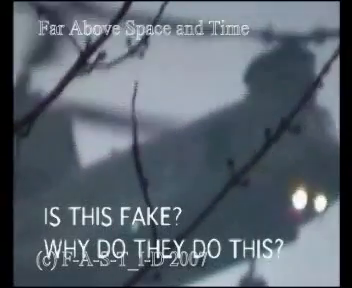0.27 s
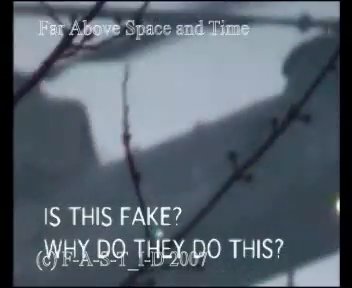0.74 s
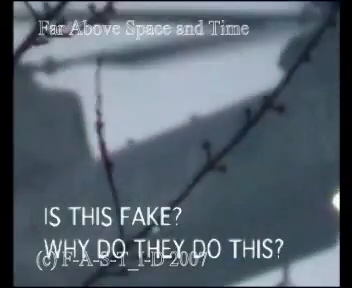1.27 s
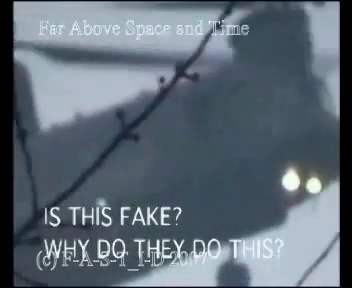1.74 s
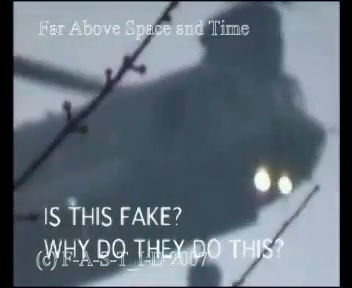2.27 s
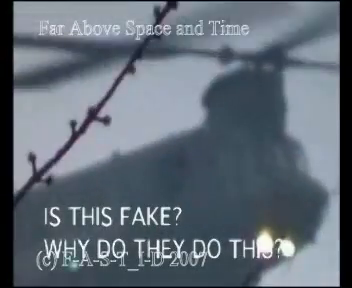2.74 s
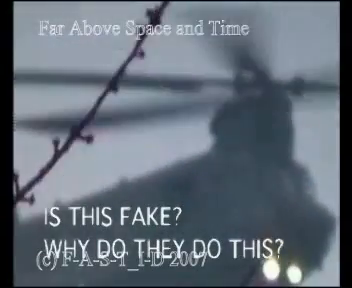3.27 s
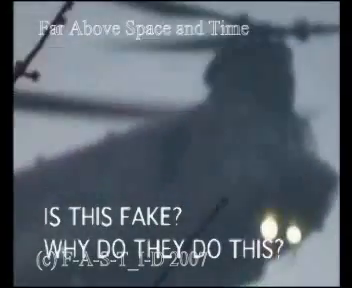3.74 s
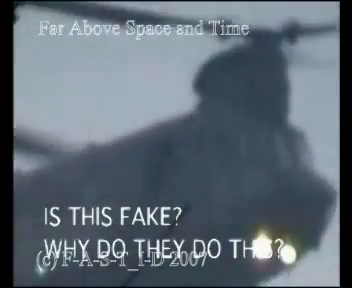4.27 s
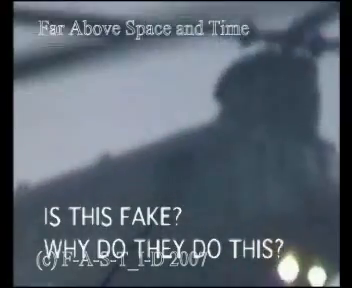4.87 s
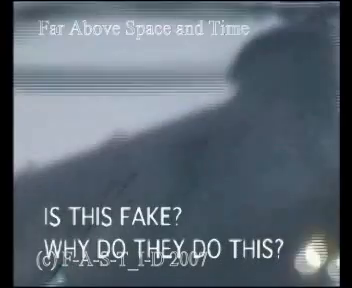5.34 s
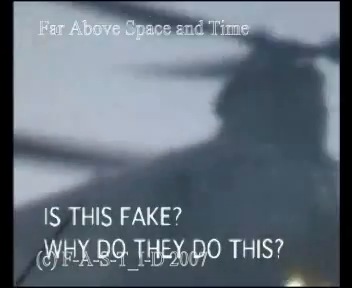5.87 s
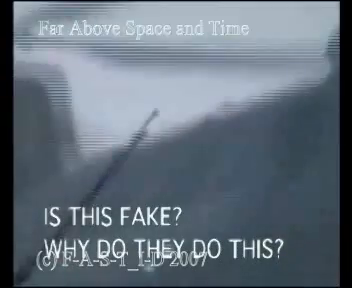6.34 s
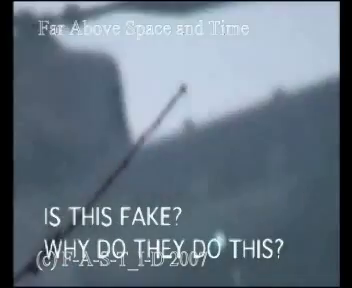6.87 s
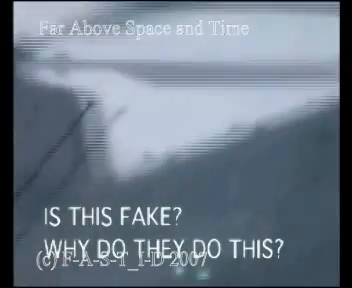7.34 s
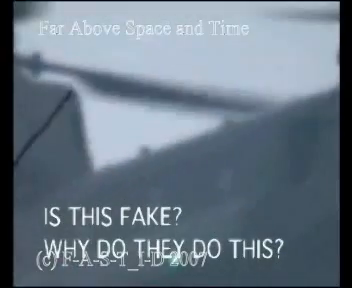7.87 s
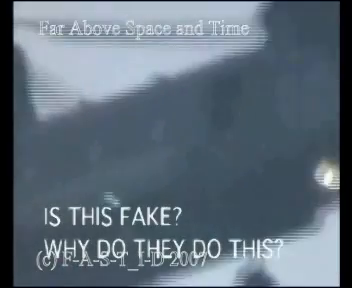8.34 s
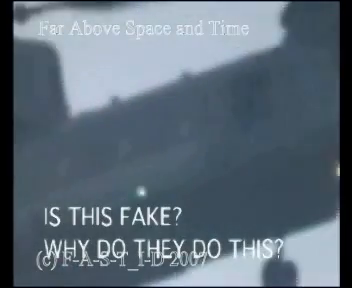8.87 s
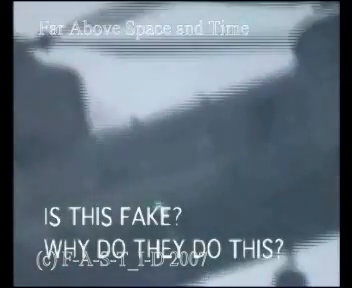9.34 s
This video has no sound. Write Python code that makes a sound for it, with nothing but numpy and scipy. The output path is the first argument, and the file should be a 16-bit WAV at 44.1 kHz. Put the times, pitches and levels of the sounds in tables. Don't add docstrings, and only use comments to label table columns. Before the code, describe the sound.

A large helicopter hangs low overhead outdoors. Its broad, mid-heavy roar starts loud with crisp rapid blade slaps, falls back to a smoother wash, swells around five seconds, dips, then surges hardest just after seven before fading. Thin gear whistles show through the quieter parts. A small camera microphone adds plastic ticks, faint hiss and low wind puffs; treble is dull and peaks are squashed.

```python
import sys
import numpy as np
from scipy import signal
from scipy.fft import rfft, irfft, next_fast_len
from scipy.io import wavfile
from scipy.ndimage import uniform_filter1d, minimum_filter1d, map_coordinates

SR = 44100
rng = np.random.default_rng(int(sys.argv[2]) if len(sys.argv) > 2 else 0)


def volts_from_decibels(level):
    exponent = np.asarray(level, float) / 20
    return 10 ** exponent


def dump_mix(stems):
    frames = np.atleast_2d(stems).T
    limited = np.clip(frames, -1, 1)
    pcm = np.round(limited * 32767).astype(np.int16)
    wavfile.write(sys.argv[1], SR, pcm)


N = 423360
TIME = np.arange(N) / SR
SLAP_PHASE = .34


def rms_one(x):
    return x / np.sqrt(np.mean(x ** 2) + 1e-20)


def in_time(rows):
    seconds, *columns = np.transpose(rows)
    return [np.interp(TIME, seconds, column) for column in columns]


def at_hz(points, hz):
    points_hz, values = np.transpose(points)
    return np.interp(np.log(hz), np.log(points_hz), values)


def drift(rate):
    r = np.exp(-80 * np.pi * rate / SR)
    noise = rng.standard_normal(N // 40 + 2002)
    slow = rms_one(signal.lfilter([1], [1, -2 * r, r * r], noise)[2000:])
    return np.interp(np.arange(N) / 40, np.arange(len(slow)), slow)


def resonance(x, hz, width):
    r = np.exp(-np.pi * width / SR)
    feedback = [1, -2 * r * np.cos(2 * np.pi * hz / SR), r * r]
    return signal.lfilter(np.array([1, 0, -1]) * (1 - r * r) / 2, feedback, x + 1e-18)


def band(x, low_hz, high_hz):
    lead = 2000
    sos = signal.butter(2, [low_hz, high_hz], "band", fs=SR, output="sos")
    return signal.sosfilt(sos, np.r_[x[-lead:], x])[lead:]


def shaped(x, gain_at, causal=False):
    size = next_fast_len(N)
    gain = gain_at(np.maximum(np.arange(size // 2 + 1) * SR / size, 1))
    if causal:
        fold = irfft(np.log(gain), size)
        fold[1:size // 2] *= 2
        fold[size // 2 + 1:] = 0
        gain = np.exp(rfft(fold))
    return irfft(rfft(x, size) * gain, size)[:N]


def gusts():
    # time in seconds, loudness in dB, clearness in dB.
    air_path = [(0, -11, -2.5), (.5, -14, -0.5), (.8, -18.5, -0.5), (1.25, -18.5, 0), (1.7, -15.5, -0.5),
                (2.25, -18.5, -1.5), (2.7, -14.5, 2.5), (3.2, -18, -0.5), (3.85, -19.5, 0.5),
                (4.4, -16.5, -0.5), (4.9, -12, 1), (5.35, -15.5, -1.5), (5.8, -22, 2.5),
                (6.45, -18.5, -5.5), (7.2, -11.5, 2), (7.85, -14.5, 1.5), (8.2, -17, -2.5),
                (9.1, -17.5, -2)]
    # middle in seconds, clearness in dB, half length in seconds.
    still_air = [(.52, -0.5, 0.11), (1.059, 1, 0.068), (2.421, 2.5, 0.15), (2.802, 0, 0.082),
                 (3.33, 0, 0.087), (3.496, -2, 0.091), (4.286, 1, 0.2), (4.515, -1, 0.13), (5.054, 2, 0.13),
                 (5.33, 1.5, 0.084), (6.0, 0, 0.097), (6.336, 4, 0.3), (6.656, 0.5, 0.085),
                 (7.744, 1, 0.24), (8.624, 5.5, 0.26), (9.305, 2.5, .15)]
    loud_db, clear_db = in_time(air_path)
    pocket_db = sum(db * np.exp(-((TIME - s) / half) ** 2) for s, db, half in still_air)
    fade_db = 3 * np.maximum(TIME - air_path[-1][0], 0)
    return loud_db - fade_db + 0.42 * pocket_db, clear_db + pocket_db


def lifts(body):
    # time in seconds, peak in dB.
    early = [(.009, -3.5), (0.041, -2.5), (0.069, -6), (0.098, -10.5), (0.132, -4.5), (0.162, -7.5),
             (0.191, -5), (0.226, -11.5), (0.256, 0), (0.287, -2), (0.346, 1.5), (0.379, -6.5),
             (0.408, -1.5), (0.439, -5), (0.471, -11), (0.539, -9.5), (0.564, -6), (0.881, -7.5),
             (4.247, -7.5), (4.343, -5.5), (4.371, -5.5), (4.467, -3), (4.69, -12), (4.723, -8.5),
              (4.77, -7), (4.833, -2.5), (4.921, 0.5), (4.951, -1.5), (5.014, 1.5), (5.147, 0), (5.193, -3),
              (5.456, -6.5)]
    late = [(6.623, -5.5), (6.705, -12.5), (6.737, -4), (6.774, -4.5), (6.93, -13), (6.979, -3),
            (7.018, -0.5), (7.073, 0), (7.132, -0.5), (7.196, -1.5), (7.226, 0), (7.295, 6.5), (7.38, -6),
            (7.411, -10.5), (7.446, -1), (7.482, 1.5), (7.522, -6), (7.632, -11)]
    # three single ones, then a run from 6.06 to 6.46 s as the last gust gathers.
    further = [
        (0.787, -11.5),
        (6.587, -5),
        (7.348, -2),
               (6.064, -16), (6.134, -11.5), (6.212, -12.5), (6.311, -10.5), (6.338, -5), (6.367, -11),
            (6.407, -3), (6.456, -11)]
    crest_db, share = 6.5, 0.96
    seconds, db = np.transpose(early + late + further)
    at, lift = (seconds * SR).astype(int), np.zeros(N)
    lift[at] = share * np.clip(db - body[at] - crest_db, 1, 9)
    return lift


def blows(lift):
    decay_ms, lull_ms = 5.6, 3.1
    after = signal.lfilter([1], [1, -np.exp(-1000 / (decay_ms * SR))], lift + 1e-18)
    before = signal.lfilter([0, 1], [1, -np.exp(-1000 / (lull_ms * SR))], lift[::-1] + 1e-18)[::-1]
    return uniform_filter1d(after - before, 30)


def patches(hz):
    # middle in seconds, centre in Hz, change in dB, half length in seconds.
    brief_changes = [(0.304, 5500, 4, 0.27), (0.298, 515, -3.5, .12), (0.64, 566, 2.5, 0.19),
                     (0.759, 3780, 3.5, 0.069), (.85, 1160, -2, 0.36), (0.998, 5000, 4, .2), (1.5, 3810, -1, 0.11),
                     (1.891, 848, 0.5, 0.17), (1.9, 5030, 1.5, .1), (2.332, 4530, -5, 0.15),
                     (2.65, 2250, -1.5, .2), (2.848, 4000, 4, .12), (3.3, 1720, 5, 0.11), (3.505, 3790, 4.5, 0.11),
                     (3.52, 582, -2, .13), (3.753, 3800, -0.5, 0.16), (4.202, 850, 1.5, 0.32),
                     (4.446, 4040, 6, 0.16), (4.998, 576, 3, .15), (4.9, 4500, -1, 0.12), (5.349, 4200, 3.5, 0.2),
                     (5.701, 575, 2.5, 0.13), (5.301, 1200, -1, 0.19), (5.754, 1475, 2.5, .1),
                     (6.42, 1355, 5, 0.14), (6.3, 333, -3.5, 0.11), (7.2, 650, -0.5, 0.11), (7.554, 650, 5, 0.13),
                     (8.1, 5500, -3, 0.12), (8.492, 1210, 0, 0.11), (8.72, 1740, -6, 0.14),
                     (9.296, 1136, -4, 0.072), (9.5, 3530, -0.5, 0.16), (9.502, 650, -4.5, 0.16),
                     (1.051, 754, 0.5, 0.17), (1.079, 332, 2, 0.14), (1.798, 514, -3, .12), (2.78, 560, 1, 0.076),
                     (3.15, 657, -0.5, 0.13), (3.598, 990, -1.5, .1), (5.0, 261, 0.5, 0.2), (5.446, 230, 3, 0.23),
                     (6.93, 557, -0.5, .15), (8.5, 221.5, -7, 0.14), (0.648, 130, 4.5, .1), (6.348, 140, 4, 0.14),
                     (8.553, 335, 2.5, .15), (4.648, 6030, 2, .15), (8.903, 775, -1, 0.13)]
    s, centre_hz, db, half = np.transpose(brief_changes)[:, :, None]
    coarse = TIME[::200]
    octaves = np.log2(hz / centre_hz)
    bend = db * np.exp(-((coarse - s) / half) ** 2 - (octaves / .45) ** 2)
    return np.interp(TIME, coarse, bend.sum(axis=0))


def slaps(turns, jitter_ms, spread_db, burst_ms):
    # time in seconds, level in dB over the roar.
    slap_level = [(0, -7), (.25, -6.5), (.6, -7), (.95, -20), (4, -20), (6.1, -18), (6.38, -12), (6.6, -17),
                  (6.95, -10), (7.25, -6), (7.6, -11), (7.9, -20), (9.6, -18)]
    blade_db = [1.5, -1.0, 0.5, -1.5, 1.0]
    passages = np.flatnonzero(np.diff(np.floor(turns - SLAP_PHASE)) > 0)
    chance = rng.standard_normal((len(passages), 2))
    late = (chance[:, 0] * jitter_ms * SR / 1000).astype(int)
    at = np.clip(passages + late, 0, N - 1)
    clicks = np.zeros(N)
    clicks[at] = volts_from_decibels(np.resize(blade_db, len(at)) + spread_db * chance[:, 1])
    fade = np.exp(-1000 / (burst_ms * SR))
    tails = signal.lfilter([1], [1, -fade], clicks + 1e-18) * rng.standard_normal(N)
    return rms_one(rms_one(clicks) + .85 * rms_one(tails)) * volts_from_decibels(in_time(slap_level)[0])


def roar(turns, patchy_db, throb_db, turn_db):
    # pitch in Hz, level in dB per Hz.
    roar_colour = [(60, -26), (130, -10.5), (200, -5.5), (290, 0), (550, -1), (1000, -3.5), (1500, -8.5),
                   (1800, -14), (2400, -17.5), (2900, -23.5), (4500, -34), (6800, -43.5), (8000, -56),
                   (11500, -93)]
    # pitch in Hz, level in dB.
    slap_colour = [(250, -8), (600, 0), (1300, 3), (2500, 2), (4000, -3), (6500, -8), (9000, -24)]
    gust_hz = [170, 400, 1250, 2600, 5200]
    loud_share = [.45, 1.0, 1.0, 1.0, 1.0]
    clear_share = [-0.017, -0.78, 0.66, 0.96, 0.36]
    # time in seconds, depth in dB, lag of lows and lag of highs in passages.
    swish = [(0, 2.2, .2, .2), (.6, 1.8, .27, .2), (1.2, 1.1, .33, .3), (3.2, 1.1, .33, .3),
             (4.4, 1.5, .36, .33), (5.6, 1.0, .33, .3), (6.5, 1.7, .34, .28), (7.3, 2.2, .27, .22),
             (7.8, .7, .5, .35), (8.3, 1.0, .7, .45), (9.6, .8, .72, .45)]
    body, clear = gusts()
    swell = [(loud - 1) * (body - np.mean(body)) + open_air * clear + .7 * drift(1.5)
             for loud, open_air in zip(loud_share, clear_share)]
    angle = 2 * np.pi * turns / 5
    uneven = np.cos(angle + 2.2) + np.cos(2 * angle - 2.5)
    depth, *lags = in_time(swish)
    dull, bright = [throb_db * depth * np.cos(2 * np.pi * (turns - SLAP_PHASE - lag)) + turn_db * uneven
                    for lag in lags]
    white = rng.standard_normal((2, N))
    slap = slaps(turns, jitter_ms=.4, spread_db=1.2, burst_ms=2.0)
    shimmer = [drift(16) for _ in range(10)]
    edges, out = 50 * 2 ** (np.arange(25) / 3), 0
    for k, (low, high) in enumerate(zip(edges, edges[1:])):
        hz = np.sqrt(low * high)
        place = np.interp(np.log(hz), np.log(gust_hz), np.arange(len(swell)))
        lower = min(int(place), len(swell) - 2)
        gust = swell[lower] + (place - lower) * (swell[lower + 1] - swell[lower])
        mix = k % 3 * np.pi / 6
        eddy = np.cos(mix) * shimmer[k // 3] + np.sin(mix) * shimmer[k // 3 + 1]
        lively = np.clip(np.log2(hz / 150) / 2.1, 0, 1)
        throb = dull if hz < 1800 else bright
        flutter = lively * (throb + patchy_db * eddy) + 0.72 * drift(7.0)
        out = out + volts_from_decibels(gust + flutter + patches(hz)) * band(white[k % 2], low, high)
    out = shaped(out, lambda hz: volts_from_decibels(at_hz(roar_colour, hz)) * (hz > 55))
    lift = lifts(body)
    cracks = slap + 1.0 * lift
    out += shaped(cracks, lambda hz: volts_from_decibels(at_hz(roar_colour, hz) + at_hz(slap_colour, hz)), causal=True)
    return out * volts_from_decibels(body - 1.38 + blows(lift)) / np.std(band(out, 190, 2500))


def thump(turns):
    # time in seconds, then the levels of multiples 1, 2, 4 and 5 in dB.
    strong = [(0, -44, -32.5, -37, -34.5), (1, -43, -50, -36.5, -37), (2.5, -49, -50.5, -35.5, -47),
              (4.5, -49, -47.5, -36, -38.5), (5.8, -42, -54, -39.5, -41.5), (7.5, -42, -47, -46, -41),
              (8.5, -42, -42, -40, -41.5), (9.6, -40, -44.5, -44, -42)]
    # multiple of the blade rate, level in dB.
    steady = [(3, -53), (6, -51.5), (8, -51.5), (9, -42)]
    levels = list(zip([1, 2, 4, 5], in_time(strong)))
    levels += [(k, db + 2.3 * drift(0.54)) for k, db in steady]
    return sum(np.sqrt(2) * volts_from_decibels(db) * np.cos(2 * np.pi * k * turns + 1.35 * k + 0.097 * drift(0.64))
               for k, db in levels)


def gears():
    # pitch in Hz, width in Hz, level in dB against the roar.
    meshes = [(1168, 9, -25), (2294, 6, -36), (2337, 24, -32), (3515, 36, -40), (4680, 55, -46.5)]
    # time in seconds, load in dB of second, third and high pair, pitch of the pair in parts per 1000.
    gear_load = [(0, -8, -5, 0, -1), (.6, 2, 4, 3, -1), (1.0, 0, 7, 7, -1), (1.3, -2, 6, 2, -1),
                 (1.85, -2, 4, 5, -1), (2.2, -3, 3, 1, -1), (2.5, 5, 4, 2, 0), (2.85, 8, 12, 10, 1.5),
                 (3.2, 4, 7, 3, 1.5), (4, 0, 0, -1, 2), (4.8, 6, 3, -1, 2.5), (5.5, 1, 2, 1, 2),
                 (7, -3, -2, -3, -1), (7.9, 3, 4, 5, -3), (8.3, 1, 2, 1, -3), (8.65, 1, 3, 4, -3),
                 (9.2, 0, 4, 4, -3), (9.6, 0, 5, 4, -3)]
    body, out = gusts()[0], 0
    second, third, high, sway = in_time(gear_load)
    loads = [0, second, np.maximum(third, second), high, high]
    for (hz, width, db), load in zip(meshes, loads):
        whistle = resonance(resonance(rng.standard_normal(N), hz, width), hz, width)
        strength = uniform_filter1d(rms_one(whistle) ** 2, 1500)
        whistle = whistle / (strength + .2) ** .35
        if hz > 3000:
            swayed = np.arange(N) + np.cumsum(sway) / 1000
            whistle = map_coordinates(whistle, [swayed], order=3, mode="reflect")
        out = out + volts_from_decibels(db + load + 1.5 * drift(3)) * rms_one(whistle)
    return volts_from_decibels(body) * out


def ground(x):
    # pitch in Hz, share returned.
    returned = [(100, 0.69), (600, 0.57), (1000, 0.32), (1300, 0.44), (1700, 0.31), (2300, 0.3),
                (3500, 0.023)]
    # time in seconds, lag in ms, strength in dB.
    bounce_path = [(0, 7.2, 0.1), (1, 7.2, 0.1), (1.6, 7.2, 0.1), (2.8, 7.3, .5), (3.4, 7.3, -.5),
                   (4.1, 7.3, -.5), (4.6, 7.08, 0.1), (6.4, 7.05, -.5), (7.0, 7.05, 1.2), (8.2, 7.0, 1),
                   (8.9, 7.1, 0.1), (9.6, 7.1, 0.1)]
    # lag in ms, share of the ground bounce.
    side_echoes = [(6.0, 0.21), (7.75, 0.084), (9.4, 0.26)]
    dull = shaped(x, lambda hz: np.clip(at_hz(returned, hz), 0, .95))
    lag_ms, strength_db = in_time(bounce_path)
    lag_ms = lag_ms + .03 * drift(0.11) + 0.088 * drift(4.0)
    delayed = map_coordinates(dull, [np.arange(N) - lag_ms * SR / 1000], order=3, mode="reflect")
    sides = sum(share * np.roll(dull, round(ms * SR / 1000)) for ms, share in side_echoes)
    return x + volts_from_decibels(strength_db) * delayed + sides


def camera():
    # time in seconds, peak in dB, pitch in Hz, width in Hz. The faint rows at 0.165, 0.171, 7.02,
    # 7.085 and 7.351 s are brief crackles at the loudest moments, not ticks of the camera.
    short_ticks = [(0.041, -29.5, 8100, 1500), (.165, -37, 9450, 4000), (.171, -35.5, 9570, 3980),
                   (7.02, -34.5, 9000, 4020), (7.085, -36.5, 9450, 4020), (7.351, -35.5, 9400, 2000),
                   (1.8734, -11.5, 8700, 4940), (1.889, -39.5, 9870, 3020), (2.049, -20, 7360, 2190),
                   (2.113, -29.5, 7200, 2010), (2.4067, -18, 7640, 2460), (5.0, -39, 9440, 4000),
                   (5.2259, -35, 7400, 1400), (7.14, -34, 8500, 920), (7.48, -40, 8930, 1500),
                   (9.48, -34.5, 7470, 2500), (9.55, -24.5, 7600, 2490)]
    # pitch in Hz, level in dB.
    whine = [(6900, -77), (7349, -83), (7500, -79), (7800, -81)]
    # end in seconds, peak in dB, build-up in dB per second.
    rubs = [
        (.88, -54, 175),
        (1.42, -49.5, 124),
    ]
    let_go = 246
    rub = sum(volts_from_decibels(db + np.minimum(rise * (TIME - s), let_go * (s - TIME))) for s, db, rise in rubs)
    out = rub * volts_from_decibels(2.4 * drift(25)) * rms_one(band(rng.standard_normal(N), 6000, 9500))
    out += volts_from_decibels(-60) * rms_one(band(rng.standard_normal(N), 4800, 6960))
    top_db = -77.5 - .6 * (gusts()[0] + 16.0)
    out += volts_from_decibels(top_db) * rms_one(band(rng.standard_normal(N), 7300, 7800))
    click = np.zeros(400)
    click[[0, 42]] = 1, -.2
    for s, db, hz, width in short_ticks:
        tick = resonance(resonance(click, hz, width), hz, width)
        tick += 0.33 * resonance(resonance(click, 11400, 1100), 11400, 1100)
        tick += 0.11 * resonance(click, 6000, 1500)
        start = round(s * SR)
        out[start:start + len(tick)] += volts_from_decibels(db) * tick / np.max(np.abs(tick))
    return out + sum(np.sqrt(2) * volts_from_decibels(db) * np.sin(2 * np.pi * hz * TIME) for hz, db in whine)


def wind():
    # middle in seconds, peak in dB, half length in seconds.
    puffs = [(.17, -57, 0.054), (1.0, -45, 0.17), (3.327, -42, 0.17), (4.3, -46, .1), (5, -53, .07),
             (6.077, -42, 0.087), (7.206, -60, 0.18), (8.15, -37, 0.079)]
    push = volts_from_decibels(-53) + sum(volts_from_decibels(db) * np.exp(-((TIME - s) / half) ** 2) for s, db, half in puffs)
    return push * volts_from_decibels(4.0 * drift(4)) * rms_one(band(rng.standard_normal(N), 30, 95))


def scene():
    # time in seconds, extra travel time of the sound in ms.
    travel = [(0, 0.0), (1, 2.0), (2, 3.6), (3, 4.1), (4, 3.3), (5, 2.6), (6.5, 1.8), (7.5, 2.3),
              (9.6, 4.3)]
    turns = 32.575 * (TIME - in_time(travel)[0] / 1000)
    machine = ground(roar(turns, patchy_db=.9, throb_db=1.0, turn_db=.45) + gears())
    return (machine + thump(turns) + wind() + camera())[None]


def roll_off(x):
    return signal.sosfilt(signal.butter(12, 12110, fs=SR, output="sos"), x)


def record(dry):
    # pitch in Hz, colour in dB.
    microphone = [(2500, 0.13), (2950, 0), (3700, 4), (4500, 3.05), (5400, 0.6), (6700, 2), (8000, -2.1)]
    middle_colour = [(470, -0.21), (560, 2), (665, -1.5), (750, 0.5), (900, 0.19)]
    top, span = .72, round(1.5 * SR / 1000)
    heard = shaped(dry[0], lambda hz: volts_from_decibels(at_hz(microphone, hz) + at_hz(middle_colour, hz)))
    duck = minimum_filter1d(np.minimum(1, 1.17 * top / (np.abs(heard) + 1e-9)), 2 * span)
    ducked = heard * uniform_filter1d(uniform_filter1d(duck, span), span)
    limited = ducked / (1 + np.abs(ducked / top) ** 8) ** (1 / 8)
    cut = signal.sosfilt(signal.cheby2(10, 60, 14000, fs=SR, output="sos"), limited)
    return roll_off(cut[None])


dry = scene()
out = record(dry)
dump_mix(out)
```